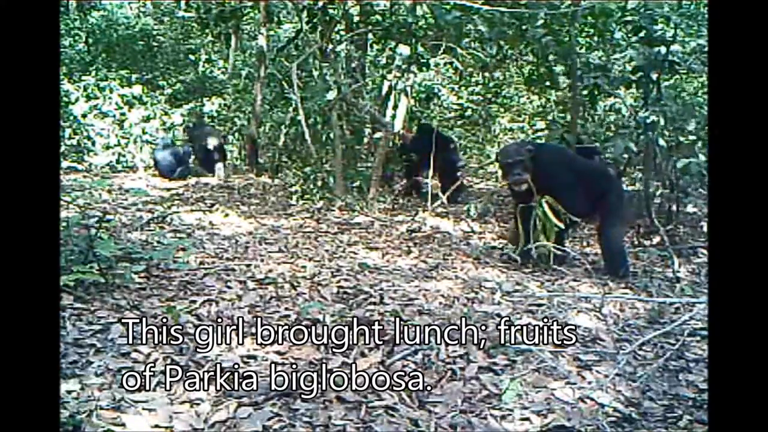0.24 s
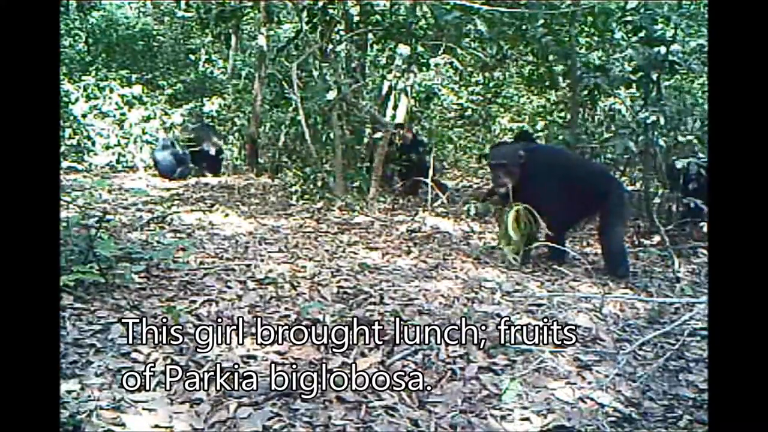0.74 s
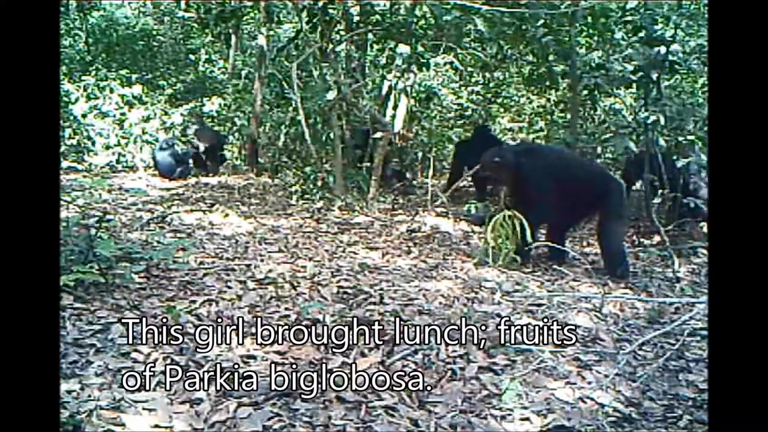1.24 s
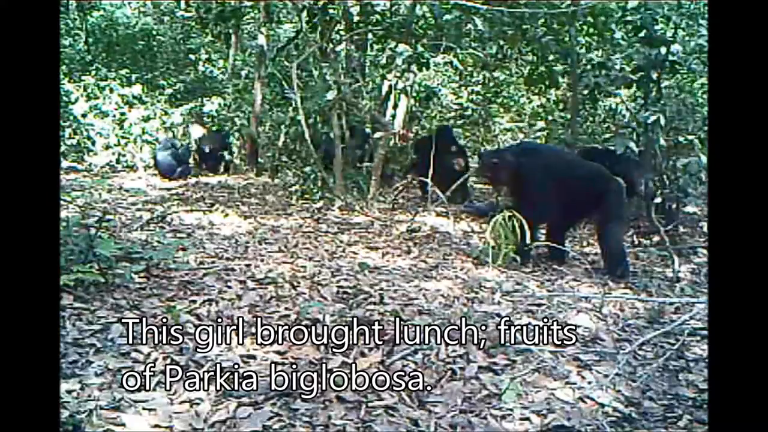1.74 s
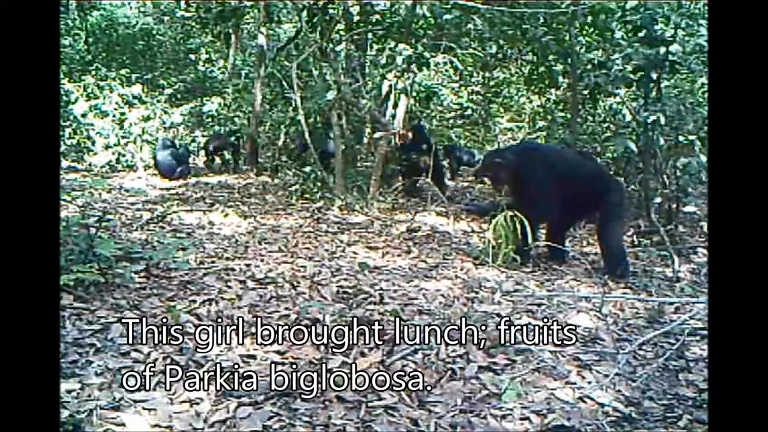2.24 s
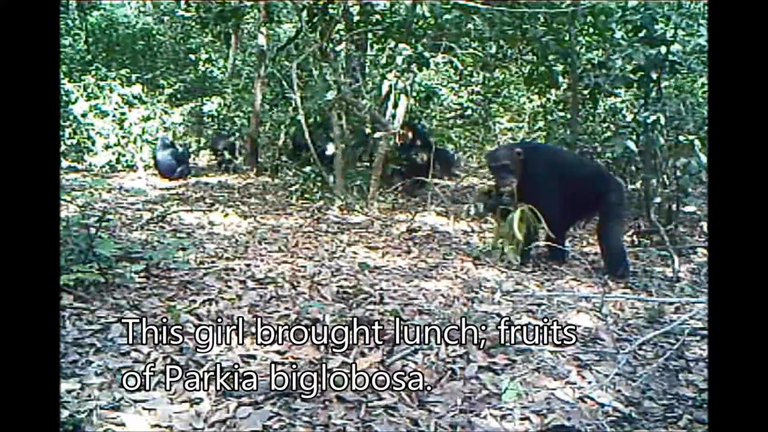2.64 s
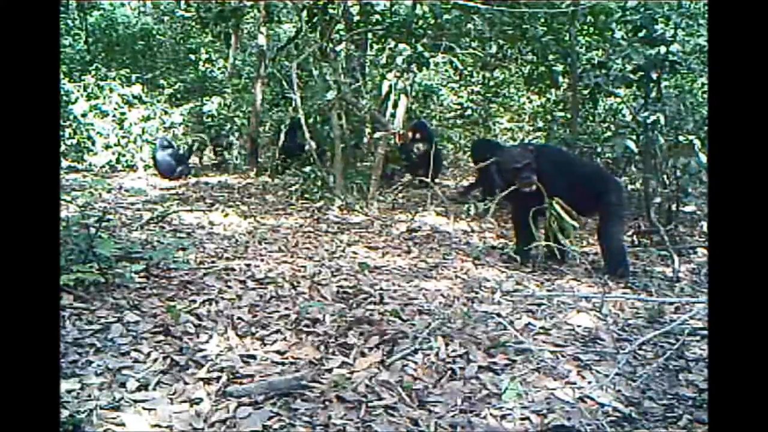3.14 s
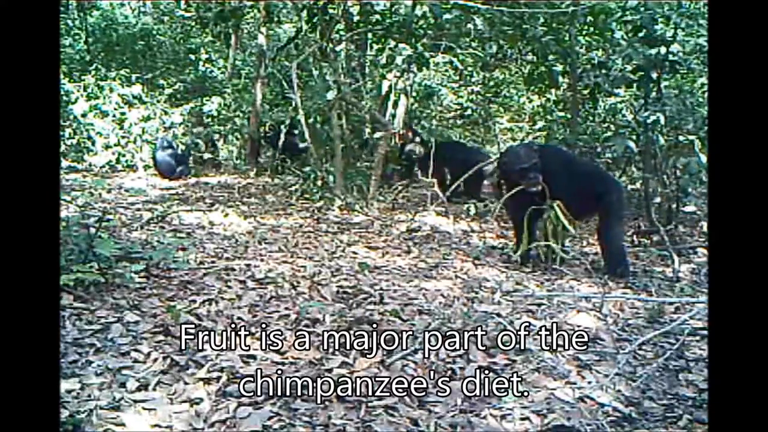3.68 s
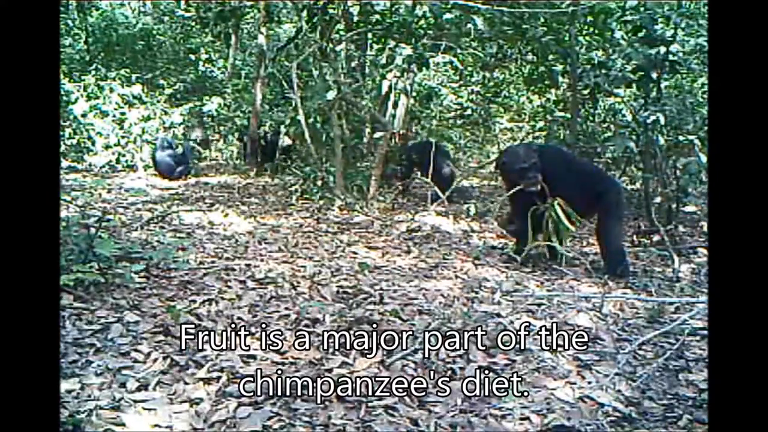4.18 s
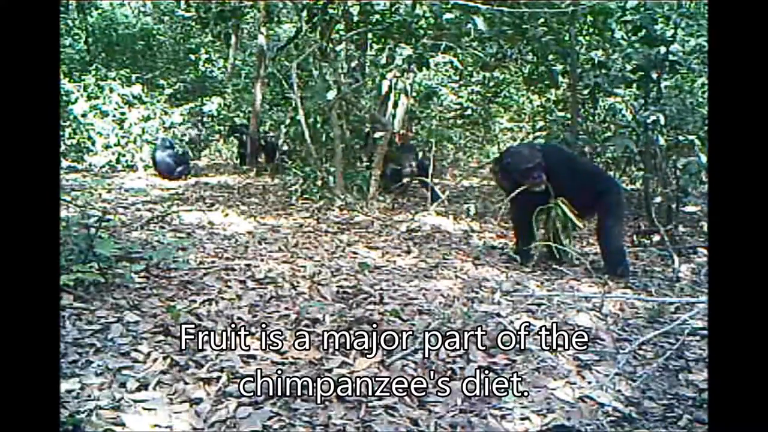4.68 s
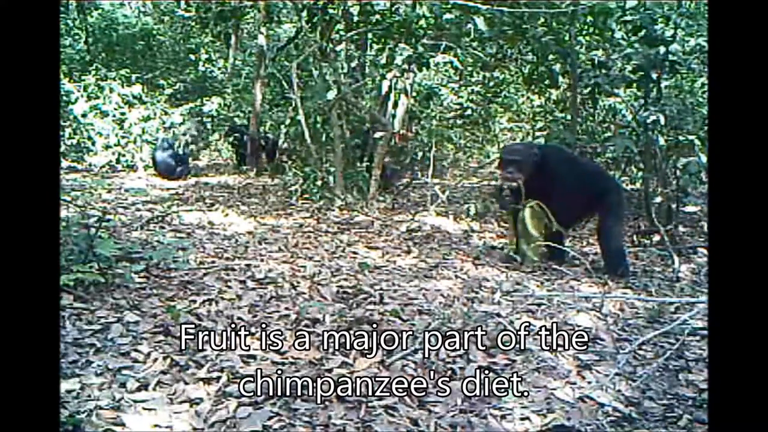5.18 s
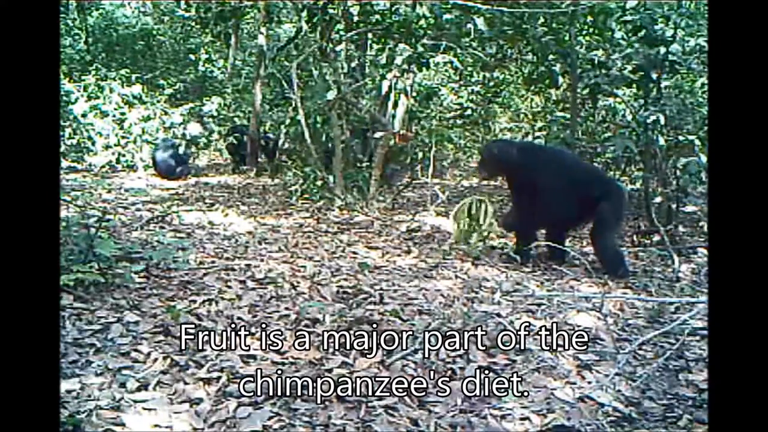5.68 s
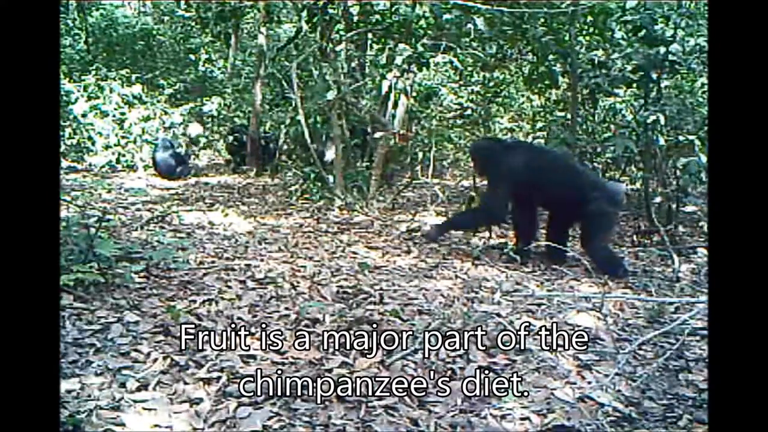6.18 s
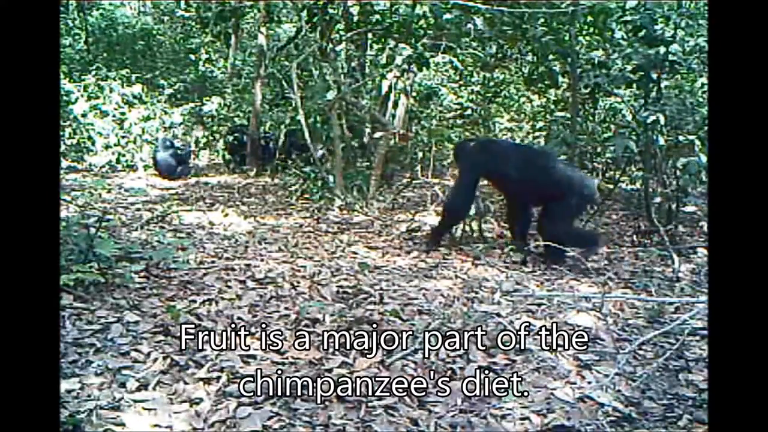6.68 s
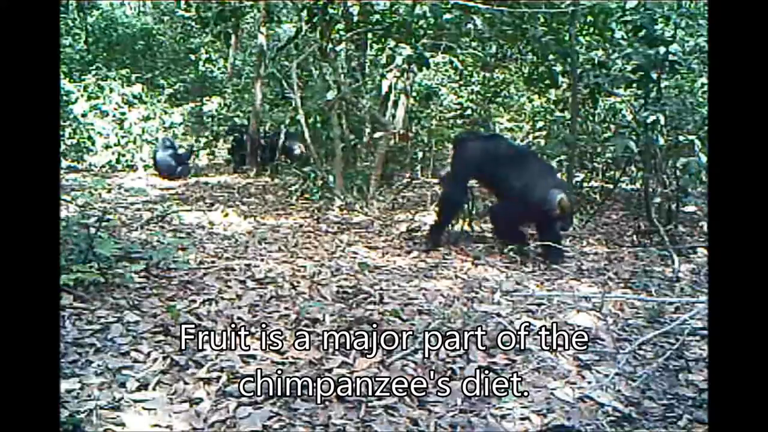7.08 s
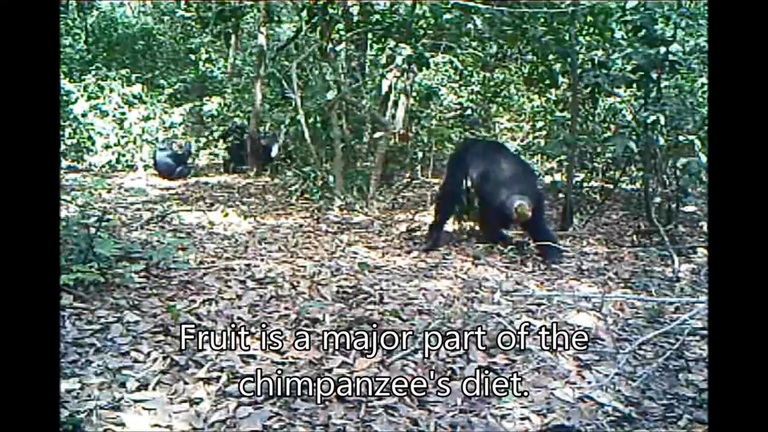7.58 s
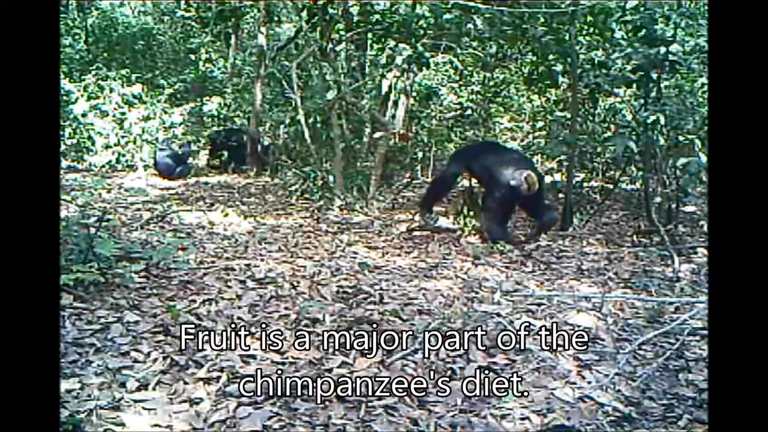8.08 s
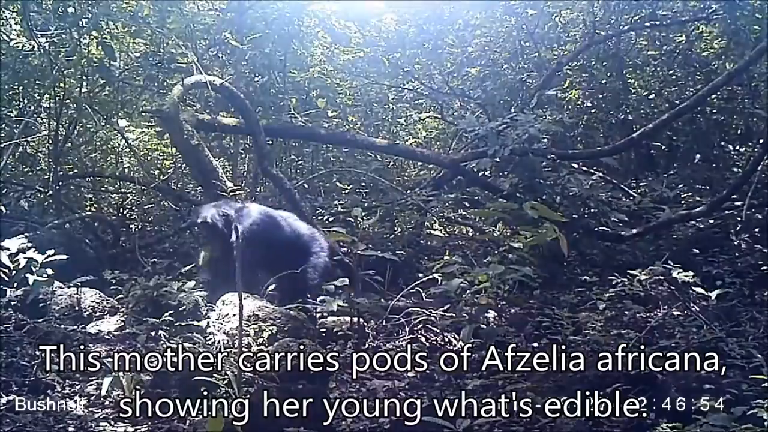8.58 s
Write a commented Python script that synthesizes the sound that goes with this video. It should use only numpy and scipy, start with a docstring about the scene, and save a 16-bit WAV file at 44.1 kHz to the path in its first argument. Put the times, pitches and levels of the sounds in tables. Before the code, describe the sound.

Chimpanzee grunts build into hoarse barks and piercing screams, then one falling whimper, over a dry insect drone and leaf rustle that abruptly cuts off.

```python
"""Chimpanzees feeding in a forest clearing

Low grunts build into barks and rough arched screams, then end in a falling whimper. Each call is a stack
of overtones and pulsing breath noise shaped by a throat; noise echoes stand for trunks and trees behind.
Beneath runs a high rustling drone of insects and dry leaves, made of tiny clicks that ring, with twig
snaps and a low rumble. Near the end the sound is cut off: a level step thumps and a very faint hush is left."""
import sys
import numpy as np
from scipy import signal
from scipy.fft import rfft, irfft, next_fast_len
from scipy.io import wavfile
from scipy.ndimage import uniform_filter1d, map_coordinates

SR = 44100
rng = np.random.default_rng(int(sys.argv[2]) if len(sys.argv) > 2 else 0)


def generate_wav(sig):
    """Save sig (samples, or channels by samples) to the path in sys.argv[1] as 16-bit PCM at SR."""
    pcm = np.round(np.clip(np.atleast_2d(sig).T, -1, 1) * 32767).astype(np.int16)
    wavfile.write(sys.argv[1], SR, pcm)


N = 389403
T = np.arange(N) / SR  # time in seconds
TOP_HZ = 15700  # upper limit of the whole sound

# resonances that give the leaves and snaps their dry ring: (pitch_hz, width_hz, level_db)
RASP_MODES = [(1976, 174, -15.5), (2587, 540, -15), (3106, 190, 0), (3670, 376, -5), (4036, 180, -8.5),
              (4357, 186, -11.5)]


def troop():
    """All the calls: each push of breath drives the vocal folds, and the throat colours the result."""
    # soft grunts: (middle_s, length_s, pitch_hz, level_db)
    grunt_rows = [(1.649, .12, 379, -66.5), (2.043, 0.1, 383.5, -62.5), (2.282, .12, 394, -54.5),
                  (2.668, 0.093, 367.3, -57.5), (3.041, .11, 401, -63), (3.178, 0.05, 478.7, -61.5),
                  (3.277, 0.084, 249.5, -57)]
    # barks: (start_s, length_s, attack_s, release_s, top_pitch_hz, crest as a share of the length,
    #   pitch drop at the start 0-1, pitch drop at the end 0-1, level_db, roughness 0-1,
    #   open_mouth_brightness_db, overtone_slope_db per octave, resonance shift from drawn-back lips as a ratio)
    bark_rows = [(3.219, .1, 0.032, 0.028, 513, 0.44, .15, .2, -51.5, 0.83, -26.5, 7, 0.86),
                 (3.461, 0.094, 0.071, .045, 649.6, 0.43, .06, 0.3, -41, 0.95, -24, 3.5, 0.84),
                 (3.686, .16, 0.035, 0.069, 1046, .38, 0.2, 0.54, -36.5, .88, -7.5, -2.5, 1.0),
                 (3.975, .133, 0.036, 0.034, 809.6, 0.56, .06, 0.06, -33, .8, -0.5, 1.5, .92),
                 (4.854, .112, 0.053, 0.052, 1000, .34, .22, .44, -35, 0.69, 16, -9.5, 1.026)]
    # screams: same columns as the barks
    scream_rows = [(4.24, .174, 0.021, 0.037, 1837, .42, .3, .35, -31, .66, 2.3, 6, 1),
                   (4.563, 0.096, .028, 0.02, 1322, .4, 0.131, 0.18, -33.5, 0.15, 15.8, -12.5, 0.99),
                   (5.11, .24, 0.078, 0.069, 1777, .48, .46, 0.52, -33.5, 0.73, 2.4, 5.5, 0.98)]
    # clean hoots and the closing whimper: (loudest_s, rise_s, fall_s, pitch_hz, glide in octaves per s,
    #   level_db, overtone_slope_db per octave, resonance shift as a ratio)
    hoot_rows = [(4.025, 0.028, 0.064, 703, -1.1, -40.5, -4, 1.1),
                 (4.09, 0.053, 0.094, 646, -2, -45.5, -4.5, 1.1),
                 (4.172, .04, 0.025, 568, -2, -51.5, -10.5, 1.34),
                 (4.507, 0.026, 0.0173, 568, 1, -46.5, -26, 1.3),
                 (5.728, .075, 0.037, 777, -3, -45.5, -13.5, 1.05)]
    # squeaks, where the voice cracks into one clear note: (middle_s, pitch_hz, level_db, brightness_db,
    #   overtone_slope_db per octave, length_s)
    squeak_rows = [(3.298, 511, -35.5, -36.5, 6.5, .03), (3.513, 661, -38.5, -32, 8.5, .018),
                   (5.024, 1493, -30.5, 6.5, 1, 0.0086)]
    calls = sum(grunt(*row) for row in grunt_rows)
    calls = calls + sum(bark(row) for row in bark_rows)
    calls = calls + sum(scream(row) for row in scream_rows)
    calls = calls + sum(hoot(*row) for row in hoot_rows)
    return calls + sum(squeak(*row) for row in squeak_rows)


def scream(row):
    """A high call that shoots up, cracks into a loud clear whistle, then tears as the folds strain."""
    return arch(*row, bend=2.2, fade_db=-22.5, swell_db=0.5, mouth_share=0.4, opening_db=0,
                strain_s=0.0349, relax=0.33, crack_db=6.5)


def bark(row):
    """A hoarse call, rough almost at once, that swells and opens, then clears a little as it sinks."""
    return arch(*row, bend=1.5, fade_db=-21, swell_db=6.5, mouth_share=0.91, opening_db=12,
                strain_s=.005, relax=0.54, crack_db=2.0)


def arch(start, length, attack, release, hz, crest, rise, fall, db, rough, bright_db, slope_db, shift,
         bend, fade_db, swell_db, mouth_share, opening_db, strain_s, relax, crack_db,
         crack_s=.021, crack_width_s=0.0059):
    """One push of breath: pitch arches over a crest, the mouth opens with effort, and strain roughens it."""
    t = np.linspace(0, length, 96)
    u = t / length
    crest = np.clip(crest, .1, .9)
    drop_before = rise * np.abs(1 - u / crest) ** bend
    drop_after = fall * np.abs((u - crest) / (1 - crest)) ** bend
    drop = np.where(u < crest, drop_before, drop_after)
    pitch_hz = hz * (1 - np.minimum(drop, .8))
    # slack is the missing effort at either end of the breath
    opening = np.maximum(1 - t / attack, 0)
    closing = np.maximum(1 - (length - t) / release, 0)
    slack = opening ** 1.83 + closing ** 1.47
    crack = np.exp(-((t - crack_s) / crack_width_s) ** 2)  # a brief louder moment
    level_db = db + fade_db * slack + swell_db * (u - .5) + crack_db * crack
    roughness = rough * (1 - np.exp(-(t / strain_s) ** 2)) * (1 - min(relax, 1) * closing)
    mouth_db = bright_db + mouth_share * fade_db * np.sqrt(slack) + opening_db * (u - .5)
    return voice(slope_db, shift, np.transpose([start + t, pitch_hz, level_db, roughness, mouth_db]))


def grunt(s, length, hz, db, rough=0.97, onset_rough=0.11, bright_db=-21, slope_db=-3):
    """A short closed-mouthed call: a voiced start falls in pitch and breaks up into a low rattle."""
    # (time_s, pitch_hz, level_db, roughness, brightness_db)
    contour = [(s - .6 * length, 1.5 * hz, db - 11.5, onset_rough, bright_db),
               (s - length / 3, 1.2 * hz, db - 8.5, 2 * onset_rough, bright_db),
               (s - length / 8, hz, db, rough, bright_db),
               (s + length / 8, 0.74 * hz, db, rough, bright_db),
               (s + length / 2, .75 * hz, db - 24, rough, bright_db)]
    return voice(slope_db, 0.94, contour, rasp_db=14.0, low_cut=0.26)


def hoot(s, rise, fall, hz, glide, db, slope_db, shift, fade_db=-20, rough=0.11, bright_db=-24, sink=1.8):
    """A clean note through rounded lips that swells and fades; it glides, faster as the breath gives out."""
    contour = [(s - rise, hz * 2 ** (-glide * rise), db + fade_db, rough, bright_db),
               (s, hz, db, rough, bright_db),
               (s + fall, hz * 2 ** (sink * glide * fall), db + fade_db, rough, bright_db)]
    return voice(slope_db, shift, contour)


def squeak(s, hz, db, bright_db, slope_db, length, fade_db=-26, rough=0.06, shift=1.0):
    """A very short clear note on one pitch, as the voice cracks."""
    contour = [(s - length / 2, hz, db + fade_db, rough, bright_db),
               (s, hz, db, rough, bright_db),
               (s + length / 2, hz, db + fade_db, rough, bright_db)]
    return voice(slope_db, shift, contour)


def voice(slope_db, shift, contour, jitter=0.1162, shimmer=0.37, jitter_hz=560, rasp_db=-4, half_db=-11,
          low_cut=0.62):
    """One call: vocal folds that turn chaotic under strain, sounding through the throat."""
    # resonances of the throat and mouth: (pitch_hz, level_db)
    throat = [(150, -13.5), (430, -11), (700, -3), (1000, 3), (1250, -4), (1600, 3.5), (1900, -2),
              (2230, -6.5), (2650, -0.5), (3100, 9), (3800, 4), (4300, -4.5), (4900, -18), (5700, -33),
              (6550, -21), (7800, -32), (9300, -34.5), (10800, -38), (12000, -51.5), (15000, -52)]
    s, *columns = np.transpose(contour)
    span = np.arange(int(s[0] * SR), int(s[-1] * SR))
    size = len(span)
    hz, db, rough, bright_db = (np.interp(T[span], s, c) for c in columns)
    # jitter shakes the pitch, shimmer the loudness
    shaky_hz = hz * (1 + jitter * rough * wander(jitter_hz, size))
    phase = 2 * np.pi * np.cumsum(shaky_hz) / SR
    # strained folds alternate strong and weak cycles, adding lines between the harmonics
    k = np.arange(2, 29)[:, None] / 2
    weight = undb(slope_db * np.log2(k))
    weight = weight * np.where(k % 1, undb(half_db) * rough, 1)
    weight = weight * (k * hz < TOP_HZ)
    folds = np.sum(weight * np.sin(k * phase), axis=0)
    folds = folds * np.exp(shimmer * rough * wander(jitter_hz, size))
    # turbulence pulses with the folds; little of it lies below the pitch
    pitch = np.mean(hz)
    air = rng.standard_normal(size) * (1 + np.cos(phase))
    air = colour(air, [(low_cut * pitch / 2, -26), (low_cut * pitch, 0), (16 * pitch, 4 * slope_db)])
    air *= np.sqrt(SR / pitch) / 2 * undb(rasp_db) * rough ** 2
    sound = colour(folds + air, [(f * shift, g) for f, g in throat])
    # the mouth sets how strong everything above about 2 kHz is; opening it lifts that part
    low = colour(sound, [(1900, 2.5), (2500, -68.5)])
    sound = low + undb(bright_db) * (sound - low)
    # even out the loudness, then follow the level of the contour
    sound /= np.sqrt(uniform_filter1d(sound ** 2, size=350) + 1e-18)
    out = np.zeros(N)
    out[span] = sound * undb(db) * signal.windows.tukey(size, .06)
    return out


def forest(x, echo_db=-12.5, t60=1.0, early_db=-8, early_t60=0.45, gap_s=0.018):
    """The direct sound, sparse echoes from near trunks, and a diffuse tail from the trees behind."""
    t = T[:SR]
    # t60 is the time in seconds to fade by 60 dB
    tail = rng.standard_normal(SR) * undb(-60 * t / t60) * (1 - np.exp(-(t / gap_s) ** 2))
    sparse = rng.standard_normal(SR) * (rng.random(SR) < 500 / SR)  # about 500 echoes a second
    trunks = sparse * undb(-60 * t / early_t60) * (t > .006)
    response = (undb(echo_db) * unit(tail) + undb(early_db) * unit(trunks)) / np.sqrt(SR)
    # the echoes' own tone colour
    response = colour(response, [(250, 15.0), (700, 3.5), (1600, -1.5), (3300, 4.0), (6000, 1), (12000, -4.5)])
    return x + signal.fftconvolve(x, response)[:N]


def snaps(t60=0.034, gain_db=3):
    """Dry twigs and leaves snap underfoot: quick noise bursts with the same dry ring as the drone."""
    # (start_s, peak level_db before gain_db is added)
    snap_rows = [(0.671, -44.5), (2.8604, -45), (4.8115, -36.5), (6.1655, -49), (6.1798, -41),
                 (8.1539, -52)]
    out = np.zeros(N)
    t = T[:SR // 10]
    for s, db in snap_rows:
        burst = ring(rng.standard_normal(len(t)) * undb(-60 * t / t60), RASP_MODES)
        start = int(s * SR)
        out[start:start + len(t)] += burst / np.abs(burst).max() * undb(db + gain_db)
    return out


def drone(flicker_db=0.72, hiss_flicker_db=0.88, stir_db=-0.13, stir_rate=14, hiss_below_db=-8):
    """Insects and dry leaves: a swarm of clicks ringing near 3 kHz under a thin hiss; steps lift both."""
    # slow swell of the drone's rasp: (time_s, level_db)
    swell = [(0, -53), (.25, -55.5), (.42, -57), (.7, -56.5), (.85, -54.5), (1.25, -53.5), (1.5, -55),
             (1.9, -56.5), (2.17, -56.5), (2.45, -55.5), (3.25, -54.5), (5.1, -56.5), (5.95, -57),
             (6.3, -54.5), (6.65, -57.5), (7.15, -57), (7.6, -54.5), (8.3, -57)]
    # steps and tugs in the dry leaves: (loudest_s, length_s, rasp_level_db, hiss_level_db)
    rustle_rows = [(0.1, 0.065, -56, -65), (0.195, 0.068, -57, -63), (0.81, 0.045, -53.5, -64),
                   (1.013, 0.061, -57, -64), (1.648, 0.085, -53, -60), (1.767, 0.064, -53.5, -62.5),
                   (1.962, 0.071, -51.5, -62.5), (2.12, 0.11, -53.5, -60.5), (2.25, 0.092, -56, -60.5),
                   (2.636, 0.081, -52.5, -64), (2.864, 0.046, -50, -60), (3.04, 0.075, -53.5, -64),
                   (3.178, 0.055, -53, -62), (3.48, .06, -54, -59.5), (4.195, .08, -62.5, -61.5),
                   (6.262, 0.068, -56, -68), (6.848, 0.12, -56, -65), (7.79, 0.039, -55, -67),
                   (7.88, 0.089, -55.5, -64), (8.454, 0.15, -55.5, -64.5)]
    # tone colour of the hiss, relative levels: (pitch_hz, level_db)
    hiss_colour = [(3500, -10.5), (5200, -8.5), (5800, -11), (7300, -5), (7800, -8.5), (10000, -10),
                   (11000, -5), (11800, -4), (12400, -9.5), (13800, -18), (15700, -21)]
    bed = undb(np.interp(T, *np.transpose(swell)) + stir_db * wander(stir_rate, N))
    rasp_power = bed ** 2
    hiss_power = (bed * undb(hiss_below_db)) ** 2
    for s, length, rasp_db, hiss_db in rustle_rows:
        stir = rustle(s, length)
        rasp_power = rasp_power + stir * undb(rasp_db) ** 2
        hiss_power = hiss_power + stir * undb(hiss_db) ** 2
    clicks = crackle(3000, 2.0, 1.0) * undb(flicker_db * wander(60, N))
    hiss = crackle(6000, 1.9, 2.16) * undb(hiss_flicker_db * wander(60, N))
    rasp = unit(ring(clicks, RASP_MODES)) * np.sqrt(rasp_power)
    return rasp + unit(colour(hiss, hiss_colour)) * np.sqrt(hiss_power)


def rustle(s, length, attack_share=0.38):
    """Power of one stir of the leaves over time: it rises quickly and settles more slowly."""
    share = np.clip(attack_share, .1, .9)
    width_s = length * np.where(T < s, share, 1 - share)
    return np.exp(-np.minimum(((T - s) / width_s) ** 2, 50))


def crackle(rate, spread_db, smooth):
    """Dense tiny clicks of uneven size, about rate a second, over a smooth hiss."""
    sizes = undb(spread_db * np.minimum(rng.exponential(size=N), 5))
    clicks = rng.standard_normal(N) * (rng.random(N) < rate / SR) * sizes
    return unit(unit(clicks) + smooth * rng.standard_normal(N))


def ring(x, modes):
    """Sum of resonances with alternating sign, then an overall tone colour that trims their skirts."""
    out = 0
    for k, (hz, width, db) in enumerate(modes):
        b, a = signal.iirpeak(hz, hz / width, fs=SR)
        out = out + (-1) ** k * undb(db) * signal.lfilter(b, a, x)
    return colour(out, [(900, -12.5), (1900, -2.0), (3100, -1.5), (3310, -8), (3550, -2.5), (4500, -0.5),
                        (5300, -11.5), (8000, -19.0)])


def low_rumble(level_db=-57.5):
    """Steady noise, strongest in the deepest bass."""
    # relative levels: (pitch_hz, level_db)
    rumble_colour = [(10, 4), (25, -0.5), (50, -5), (100, -10.5), (250, -20), (450, -25.5), (800, -28.5),
                     (1150, -34), (2000, -27.5), (4000, -70)]
    return unit(colour(rng.standard_normal(N), rumble_colour)) * undb(level_db)


def faint_hush(level_db=-84):
    """Very faint steady noise throughout, heard alone after the cut."""
    # relative levels: (pitch_hz, level_db)
    hush_colour = [(20, 7.5), (110, 0), (200, -1), (700, -11), (1400, -15.5), (3500, -20.5), (4100, -18),
                   (4700, -25), (15000, -31.5)]
    return unit(colour(rng.standard_normal(N), hush_colour)) * undb(level_db)


def cut_thump(cut_s, decay_s=.04):
    """Thump of the cut: a step in level that decays."""
    return undb(-42) * (T > cut_s) * np.exp(-np.abs(T - cut_s) / decay_s)


def undb(db):
    """Decibels to gain."""
    return 10 ** (np.asarray(db) / 20)


def unit(x):
    """Scale to an rms (average strength) of 1."""
    return x / np.sqrt(np.mean(x ** 2) + 1e-30)


def gain_at(hz, points):
    """Gain of a (pitch_hz, level_db) spectrum at the given frequencies."""
    f, db = np.transpose(points)
    return undb(np.interp(np.log(np.maximum(hz, 1)), np.log(f), db))


def colour(x, points):
    """Filter a sound by a (pitch_hz, level_db) spectrum."""
    size = next_fast_len(len(x) + 2048)
    gain = gain_at(np.fft.rfftfreq(size, 1 / SR), points)
    return irfft(rfft(x, size) * gain, size)[:len(x)]


def wander(rate, size):
    """Smooth random motion through rate random points a second, with a spread near 1."""
    steps = np.arange(size) / SR * rate
    return map_coordinates(rng.standard_normal(size // 8 + 4), [steps], order=3, mode="mirror")


def scene(cut_s=8.517, cut_fade_s=0.0155):
    """The troop in its clearing; the sound is cut off, and a decaying step in level makes a low thump."""
    clearing = forest(troop()) + drone() + snaps() + low_rumble()
    fade = np.clip((cut_s - T) / cut_fade_s, 0, 1)
    return (clearing * fade + faint_hush() + cut_thump(cut_s))[None]


def record(dry):
    """A steep low-pass filter removes the treble above TOP_HZ."""
    return signal.sosfilt(signal.ellip(10, .2, 80, TOP_HZ, fs=SR, output="sos"), dry)


dry = scene()
out = record(dry)
generate_wav(out)
```